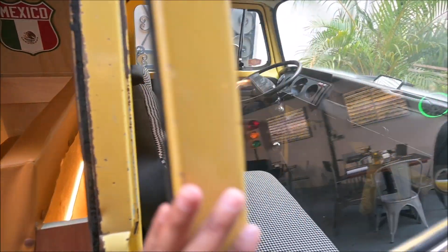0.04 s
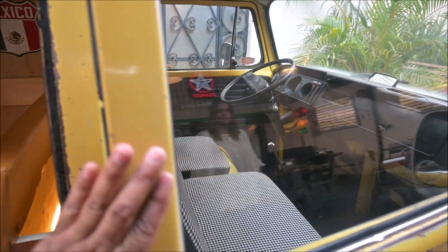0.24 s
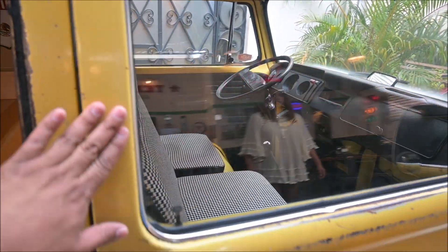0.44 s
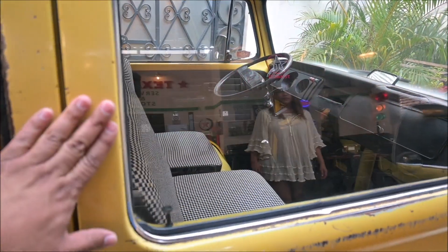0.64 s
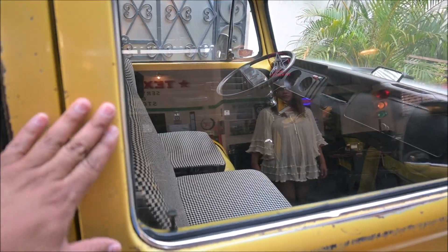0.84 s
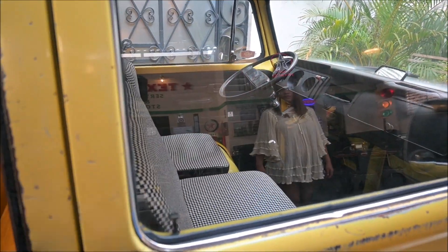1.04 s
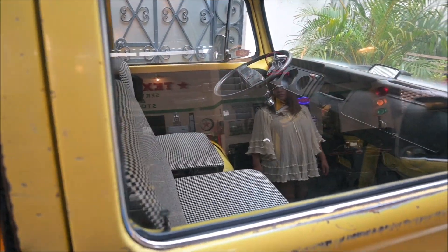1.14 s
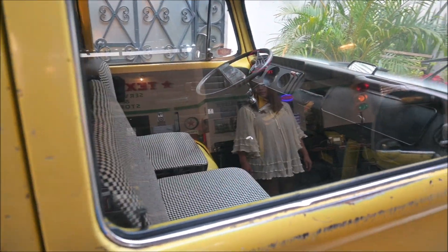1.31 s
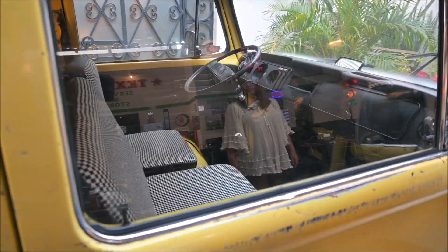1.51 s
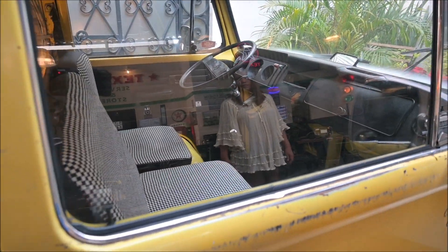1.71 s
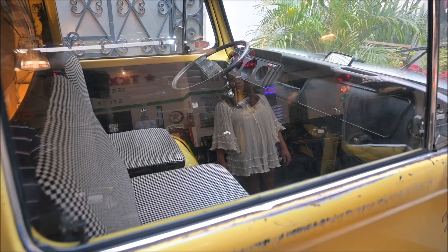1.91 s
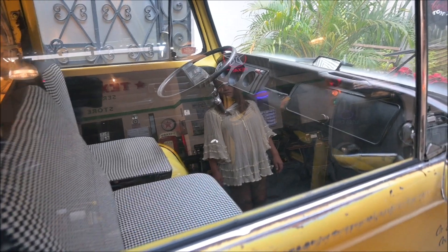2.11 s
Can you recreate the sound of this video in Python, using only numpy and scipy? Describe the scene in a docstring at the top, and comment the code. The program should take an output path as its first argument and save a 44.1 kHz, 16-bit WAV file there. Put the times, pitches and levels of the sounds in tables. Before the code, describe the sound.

A steel van door slams shut once, ringing briefly over faint distant traffic.

```python
"""A roofed space open to the street, where the steel door of an old van is pushed shut by hand.
The latch strikes with a crack and a clank, the door chatters into its frame, and the blow spreads
through the body panels over a low thump from the air in the cab. The room rings briefly.
Behind it, distant traffic swells and ebbs, with one faint far squeal and a thin bed of hiss."""
import sys
import numpy as np
from scipy import signal
from scipy.fft import rfft, irfft, next_fast_len
from scipy.io import wavfile

SR = 44100
rng = np.random.default_rng(int(sys.argv[2]) if len(sys.argv) > 2 else 0)


def persist_wave(psi):
    """Save psi, clipped to +-1, as 16-bit WAV."""
    counts = np.round(np.clip(psi, -1, 1) * 32767).astype(np.int16)
    wavfile.write(sys.argv[1], SR, np.atleast_2d(counts).T)


N = 95079
T = np.arange(N) / SR
SLAM_S, SEATED_S = .516, .62  # the door lands, then sits home in its frame

# The latch meets the striker. Each row: start in seconds, level in dB.
LATCH_HITS = [(0.5155, -2), (0.5165, -1), (0.5186, -1), (0.5345, -10)]
# The clank of its steel parts. Each row: pitch in Hz, level in dB, t60 in seconds.
LATCH_MODES = [(1165, -4, 0.053), (1325, -3, .06), (1551, -5.5, 0.04), (2067, -6, 0.043), (2720, -10, .045),
               (2775, -3, 0.025), (3010, -4, .045), (3217, 0.5, .05), (3390, -3, 0.017), (3830, -16, 0.017),
               (5540, -11.5, .06), (6600, -24, .07)]
# The dry crack of metal on metal. Each row: frequency in Hz, density in dB.
CRACK_EQ = [(200, -14), (700, -21), (1400, -26), (3100, 19), (4500, -14), (7000, 1.5), (10000, -28.5),
            (16000, -15)]
# The door chatters into its frame. Each row: start in seconds, knock in dB, rattle in dB.
CHATTER_HITS = [(0.533, 3, 2.5), (0.537, 7, -8), (0.55, -5, 3), (0.563, 6.5, -9.5), (0.573, 3, 3.5),
                (0.583, 4, 2), (0.593, 7, -15), (0.619, -4, -25), (0.644, -10, -22)]
# The dull knock and the bright rattle. Each row: frequency in Hz, density in dB.
KNOCK_EQ = [(100, -1.5), (220, 1), (700, -7), (1400, 0.5), (3100, -4.5), (5000, -20), (16000, -54)]
RATTLE_EQ = [(500, -22), (2000, -10.5), (3500, 7), (7500, 1.5), (10000, -10), (16000, -17)]
# Dense ring of sheet steel. Each row: frequency in Hz, density in dB, swell and t60 in seconds.
SHEET_BANDS = [(29.6, -15, .02, 0.29), (72, -7, .02, 1), (148, -5.5, 0.11, 0.65), (263, 3.5, 0.038, 0.61),
               (518, -4, 0.093, 0.71), (723, 2, 0.064, 0.39), (1290, -5.5, 0.025, 0.71),
               (2170, -9, 0.011, 0.72), (3000, -9, 0.022, 0.61), (4140, -18, 0.009, 0.6),
               (7500, -21.5, 0.0067, 0.35), (11400, -31.5, 0.0067, 0.24), (16000, -47.5, .02, .32)]
# The strongest panel notes. Each row: pitch in Hz, level in dB, t60 in seconds.
PANEL_MODES = [(155.5, -2, 0.78), (206, -4, 0.21), (231.7, -2, 0.35), (274, -2, 0.84), (325, -8.5, 1),
               (357, -1, 0.82), (492.8, -2.5, .5), (652.5, -6, 0.59), (690, -3, 0.47), (714, 1, 0.15),
               (776, -5, 0.6), (936, -3.5, 0.17), (976, -4.5, 0.51), (1536, -2.5, 0.21)]
# The room's tail. Each row: frequency in Hz, density in dB, t60 in seconds.
TAIL_BANDS = [(60, -21, 1.2), (160, -6.5, 1.64), (345, 6.5, 1.43), (610, -5, 1.75), (1104, 1.5, 1.01),
              (2200, -25.5, 0.33), (5000, -24.5, 0.8), (12000, -44.5, 0.34)]
# Resonances of the space, stirred by slam and traffic. Each row: pitch in Hz, level in dB.
ROOM_MODES = [(226, -0.5), (340, -5), (418, 3), (468, -4), (530, -1), (605, -5.5), (643, -1), (722, -7.5),
              (765, -7.5)]
# The rustle of the swinging door. Each row: frequency in Hz, density in dB.
SWING_EQ = [(200, -4), (1400, 5.5), (3000, -8.5), (6000, -18), (14000, -29.5)]
# The hinge ticks. Each row: start in seconds, level in dB.
HINGE_TICKS = [(0.418, -68), (0.452, -69.5)]
# The traffic wash swells and ebbs. Each row: time in seconds, level in dB.
TRAFFIC_FADER = [(0, -53), (.17, -56), (.34, -52), (.9, -51), (1.15, -49.5), (1.33, -49), (1.43, -52.5),
                 (1.55, -54), (1.78, -53), (1.95, -50), (2.15, -49.5)]
# The traffic's wash and the rumble under it. Each row: frequency in Hz, density in dB.
WASH_EQ = [(100, -14.5), (230, -3.5), (320, -2), (450, -3.5), (800, -3.5), (1200, -10), (2000, -29),
           (3400, -36.5), (5000, -80), (16000, -52)]
RUMBLE_EQ = [(25, -34), (55, -13), (75, -5.5), (92, 6.5), (130, -7), (220, -2.5), (330, -10), (800, -44),
             (4000, -46)]
# The hiss bed, mid and side. Each row: frequency in Hz, density in dB.
HISS_MID_EQ = [(100, -20.5), (3000, 8), (5000, 2), (10000, 1.5), (16000, -0.5)]
HISS_SIDE_EQ = [(100, -40), (500, -28), (1200, -16), (3000, -2.5), (6000, -4.5), (16000, -6)]
# Stereo width. Each row: frequency in Hz, side relative to mid in dB.
STEREO_WIDTH = [(100, -89.5), (350, -73), (700, -79), (1400, -56), (2800, -41.5), (5600, -20.5),
                (9000, -16.5), (14000, -13.5)]


def latch():
    """Steel hits steel: a hard crack, and a pitched clank that lingers in the room."""
    clank = sum(from_db(db) * tone(hz) * blows(LATCH_HITS, t60) for hz, db, t60 in LATCH_MODES)
    halo = sum(from_db(db) * narrow(hz, width_hz=30) for hz, db, _ in LATCH_MODES)
    halo *= blows(LATCH_HITS, t60=.66)
    snap = blows(LATCH_HITS, t60=.043)
    crack = noise(CRACK_EQ, lambda: snap)
    return from_db(-26.5) * clank + from_db(-38.5) * halo + from_db(-17.5) * crack


def chatter():
    """The door knocks against its frame; each knock shakes loose fittings into a bright rattle."""
    knock_envelope = blows([(start, db) for start, db, _ in CHATTER_HITS], t60=.065)
    rattle_envelope = blows([(start, db) for start, _, db in CHATTER_HITS], t60=.1)
    knocks = noise(KNOCK_EQ, lambda: knock_envelope)
    rattles = noise(RATTLE_EQ, lambda: rattle_envelope)
    return from_db(-29.5) * knocks + from_db(-30) * rattles


def body_panels():
    """The blow sets the sheet steel ringing; each panel note beats with a weaker neighbour."""
    notes = 0
    for hz, db, t60 in PANEL_MODES:
        pair = tone(hz) + from_db(-8) * tone(hz + rng.normal(0, 9))
        notes += from_db(db) * pair * bloom(swell=.17, t60=t60)
    return from_db(-22.5) * noise(SHEET_BANDS, bloom) + from_db(-30.5) * notes


def cab_thump(start=.528, hz=45.9):
    """Air trapped in the cab puts a low thump under the slam."""
    sub = np.sin(2 * np.pi * hz * np.maximum(T - start, 0))
    return from_db(-37.5) * sub * decay(start, t60=.41)


def room_tail():
    """The slam's diffuse tail, longest in the low mids; all but the lowest room resonance ring on."""
    swell = .24  # seconds
    ring = resonances(ROOM_MODES[1:]) * bloom(swell, t60=2.35)
    tail = noise(TAIL_BANDS, lambda t60: bloom(swell, t60))
    return from_db(-30) * tail + from_db(-48) * ring


def striker_scrape(start=.502):
    """The latch rides up the striker: a soft scrape that dies as it snaps."""
    rise = np.sqrt(np.clip((T - start) / (SLAM_S - start), 0, 1))
    return from_db(-43) * narrow(1800, width_hz=500) * rise * decay(SLAM_S, t60=.043)


def door_swing():
    """A faint rustle and two hinge ticks lead into the slam."""
    ticks = narrow(4000, width_hz=4100) * blows(HINGE_TICKS, t60=.1)
    rustle = noise(SWING_EQ, lambda: bell(peak_s=.52, width_s=.096))
    return from_db(-55) * rustle + ticks


def traffic():
    """The distant street: a swelling wash coloured by the space, a steady rumble, one thin squeal."""
    wash = noise(WASH_EQ) + from_db(-11.5) * resonances(ROOM_MODES)
    fader = from_db(np.interp(T, *np.transpose(TRAFFIC_FADER)))
    squeal = narrow(3470, width_hz=190) * bell(peak_s=1.49, width_s=.089)
    return fader * wash + from_db(-56) * noise(RUMBLE_EQ) + from_db(-79.5) * squeal


def hiss():
    """A steady bed of hiss, a little different in each ear."""
    mid, side = noise(HISS_MID_EQ), noise(HISS_SIDE_EQ)
    return from_db(-69.5) * stereo(mid, from_db(-2) * side)


def resonances(modes):
    """The hollow colour of the space: a narrow band of noise for each mode."""
    return sum(from_db(db) * narrow(hz, width_hz=17.4) for hz, db in modes)


def from_db(db):
    """Decibels to gain."""
    return 10 ** (np.asarray(db) / 20)


def rms_one(x):
    """Scale to an rms of one."""
    return x / np.sqrt(np.mean(x ** 2) + 1e-20)


def at_hz(table, hz):
    """A table's columns after the first, read along a log frequency axis."""
    table = np.array(table, float)
    return [np.interp(np.log(hz), np.log(table[:, 0]), column) for column in table[:, 1:].T]


def noise(table, envelope=lambda: 1):
    """Noise with the table's EQ, rms near one before envelope(further columns) shapes each band."""
    edges = np.geomspace(22, 17000, 25)
    white = rng.standard_normal((2, N + SR // 2))
    mix, power = 0, 0
    for k, (low, high) in enumerate(zip(edges, edges[1:])):
        db, *shape = at_hz(table, np.sqrt(low * high))
        band_pass = signal.butter(2, [low, high], "band", fs=SR, output="sos")
        band = signal.sosfilt(band_pass, white[k % 2])[-N:]  # neighbours use independent noise
        gain = from_db(db) * np.sqrt(high - low)
        mix += gain * rms_one(band) * envelope(*shape)
        power += gain ** 2
    return mix / np.sqrt(power)


def narrow(hz, width_hz):
    """Noise through one resonant peak, rms one."""
    size = next_fast_len(N)
    freqs = np.arange(size // 2 + 1) * SR / size
    spectrum = rfft(rng.standard_normal(size)) / (1 + (2 * (freqs - hz) / width_hz) ** 2)
    return rms_one(irfft(spectrum, size)[:N])


def tone(hz):
    """A sine at a random phase."""
    return np.sin(2 * np.pi * (hz * T + rng.random()))


def decay(start, t60):
    """Full level until the start, then down 60 dB every t60 seconds."""
    return np.exp(-np.log(1000) * np.maximum(T - start, 0) / t60)


def blows(hits, t60):
    """Envelope of a run of sharp hits, summed in power."""
    return np.sqrt(sum((from_db(db) * (T >= start) * decay(start, t60)) ** 2 for start, db in hits))


def bloom(swell, t60):
    """Energy builds from the slam for swell seconds; the decay sets in once the door is seated."""
    return np.sqrt(np.clip((T - SLAM_S) / swell, 0, 1)) * decay(SEATED_S, t60)


def bell(peak_s, width_s):
    """A smooth swell and fade."""
    return np.exp(-.5 * ((T - peak_s) / width_s) ** 2)


def stereo(mid, side):
    """Mid and side to left and right."""
    return np.array([mid + side, mid - side])


def widen(mid):
    """Nearly mono: only the treble spreads a little between the ears."""
    freqs = np.maximum(np.arange(N // 2 + 1) * SR / N, 1)
    side_db, = at_hz(STEREO_WIDTH, freqs)
    side = irfft(1j * rfft(mid) * from_db(side_db), N)  # a quarter cycle off the mid
    return stereo(mid, side)


def scene():
    """The door up front, its room and the street behind, hiss underneath."""
    door = door_swing() + striker_scrape() + latch() + chatter() + body_panels() + cab_thump()
    return widen(door + room_tail() + traffic()) + hiss()


def record(dry):
    """Soft saturation rounds the peaks; a steep low-pass trims the very top."""
    ceiling, cutoff_hz = .33, 15800
    low_pass = signal.ellip(10, .1, 80, cutoff_hz, fs=SR, output="sos")
    return signal.sosfilt(low_pass, ceiling * np.tanh(dry / ceiling))


dry = scene()
out = record(dry)
persist_wave(out)
```